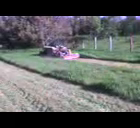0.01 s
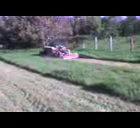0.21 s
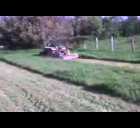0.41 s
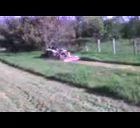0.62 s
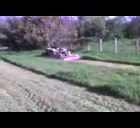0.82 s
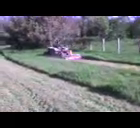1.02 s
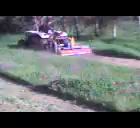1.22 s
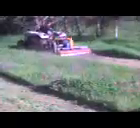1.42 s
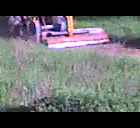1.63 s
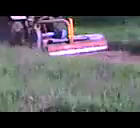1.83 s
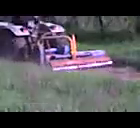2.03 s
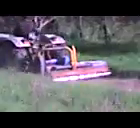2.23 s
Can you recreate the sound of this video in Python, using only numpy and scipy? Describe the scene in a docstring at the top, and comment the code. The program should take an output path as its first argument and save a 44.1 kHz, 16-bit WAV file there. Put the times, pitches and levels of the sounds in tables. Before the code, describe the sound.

A tractor-driven mower shreds tall grass over a steady diesel drone. Early on it hits something tough with a knock and a loud metallic rattle, then steady cutting returns. The open field sounds dull through a small microphone.

```python
"""Flail mower in tall grass

A diesel tractor drones through its exhaust pipe, a resonator driven by the firings, while the flails
shred stalks in a dense train of small impacts. Early on the rotor bites into something tough: a knock
and a loud rattling rasp excite the modes of the steel hood, then steady cutting is heard again.
Trees round the open field scatter a faint echo, and a small, dull microphone rounds the peaks."""
import sys
import numpy as np
from scipy import signal
from scipy.fft import rfft, irfft
from scipy.io import wavfile
from scipy.ndimage import uniform_filter1d

SR = 44100
rng = np.random.default_rng(int(sys.argv[2]) if len(sys.argv) > 2 else 0)


def inscribe(sig):
    """Save sig as 16-bit PCM at rate SR to the path in sys.argv[1].

    A 1-D sig is mono; a 2-D sig holds one channel per row.
    Samples are clipped to [-1, 1] before scaling.
    """
    pcm = np.round(np.clip(np.atleast_2d(sig).T, -1, 1) * 32767)
    wavfile.write(sys.argv[1], SR, pcm.astype(np.int16))


N = 101429

# Levels in the tables are relative; a spectrum gives level per unit bandwidth.
# Spectrum of stalks cut under the hood: f/Hz, level/dB
STALK_SPECTRUM = [(150, -32), (450, -10), (720, 1.5), (1050, 6), (1350, -2), (2050, 1.5), (2300, -3),
                  (2900, -6), (3200, -4.5), (3450, -16.5), (3900, -26.5), (4400, -50.5)]
# Envelope of the steady cutting: t/s, level/dB
CUTTING_ENVELOPE = [(0, -32), (.2, -34.5), (.6, -33), (.95, -35), (1.4, -33), (1.62, -35.5), (1.8, -34),
                    (2.14, -35), (2.3, -39.5)]
# Thick stems torn apart: t/s, level/dB, treble gain/dB
STEM_SNAPS = [(.594, -30.5, 1.5), (.675, -36.5, 7.5), (.858, -37.5, 12.5), (1.01, -35, 4.5),
              (1.218, -40, -5), (1.368, -31, 1.5), (1.752, -32.5, 5), (1.914, -40.5, 5.5),
              (2.034, -38.5, 9.5)]
# Whirr in the hood: multiple of the flail drive's rate, level/dB
WHIRR_ORDERS = [(17, -56.5), (20, -50.5), (21, -50.5), (22, -53)]
# Spectrum of hard debris striking the hood: f/Hz, level/dB
DEBRIS_SPECTRUM = [(25, -20), (60, -12), (160, -14), (280, -2), (480, -11), (750, -2.5), (1050, 0),
                   (1350, -2), (2000, -4), (2700, -4), (2900, -14.5), (3200, -7.5), (3500, -23),
                   (3900, -34.5), (4400, -51)]
# Envelope of debris churning under the hood: t/s, level/dB
CHURN_ENVELOPE = [(.204, -45), (.217, -22.5), (.255, -26.5), (.28, -24), (.31, -20), (.35, -14.5),
                  (.375, -17.5), (.41, -19), (.46, -18.5), (.515, -28), (.55, -35), (.62, -54)]
# Heavy blows of the flails: t/s, level/dB, treble gain/dB
FLAIL_BLOWS = [(.262, -25, -8.5), (.275, -16.5, -6.5), (0.321, -14.5, -7), (.335, -10, -5.5),
               (.346, -12.5, -1), (.363, -10.5, 6), (.373, -16, 7), (.388, -19.5, 3.5), (.403, -13.5, 4.5),
               (.413, -18, 4), (.43, -18.5, 1.5), (.462, -27, 5), (.508, -23, -0.5)]
# Dull knocks of clods on the hood: t/s, level/dB
CLOD_KNOCKS = [(.21, -15.5), (.343, -18), (.402, -25.5), (.446, -23.5)]
# Spectrum of a clod's knock: f/Hz, level/dB
CLOD_SPECTRUM = [(25, -11.5), (60, -0.5), (110, -2), (180, -2.5), (260, 16), (420, -7), (700, 10),
                 (1100, -2.5), (1700, -2), (2300, -18), (4000, -45)]
# Modes of the steel hood: f/Hz, T60/s, level/dB
HOOD_MODES = [(255.3, 0.16, -3.5), (736, 0.28, -12), (920, 0.23, -3.5), (1043.6, 0.24, -0.5),
              (1093, 0.07, -6), (1577, 0.15, -2), (2000, 0.12, -4), (2100, 0.14, -1.5), (2354, 0.14, -3.5),
              (2620, 0.072, -6), (2800, 0.043, -10.5), (2960, 0.088, -5.5)]
# Engine orders favoured by the exhaust pipe: multiple of the crank rate, level/dB
DRONE_ORDERS = [(10, -51), (11, -46.5), (12, -53), (13, -50.5), (14, -55.5)]
# Swelling of the drone: t/s, level/dB
DRONE_ENVELOPE = [(0, 4.5), (.6, 1.5), (1.02, -0.5), (1.14, 1.5), (1.44, -2.5), (1.54, 9), (1.66, -7),
                  (1.76, -5), (1.82, 6.5), (1.89, -5), (2.03, -0.5), (2.3, -1)]
# Spectrum of the ringing engine block: f/Hz, level/dB
BLOCK_SPECTRUM = [(300, -41.5), (600, -13), (800, -4.5), (1030, 2), (1180, -4), (1350, -13.5),
                  (2000, -10.5), (2500, -26.5), (4000, -50.5)]
# Spectrum of air and gas rumbling round the tractor: f/Hz, level/dB
RUMBLE_SPECTRUM = [(20, -40.5), (55, -9), (110, -3.5), (190, -1), (270, 6.5), (350, 2), (460, -5.5),
                   (900, -15), (3000, -39.5)]


def cutting(patchy_db=1.0):
    """Shot noise: countless stalk fractures merge into a hiss, uneven with the tufts; thick stems snap."""
    fractures = clicks(per_s=4500, spread_db=2) * undb(patchy_db * wander(60))
    stalks = envelope(CUTTING_ENVELOPE) * colour(fractures, STALK_SPECTRUM)
    return stalks + rasps(STEM_SNAPS, STALK_SPECTRUM, attack_s=.014, decay_s=.012)


def rotor(drive_hz=48.06, drift=.002, whine_hz=3053, whine_db=-51):
    """Rotation gives a whirr at harmonics of the drive rate; a narrow metal resonance adds a whine."""
    whine = resonant_band(rng.standard_normal(N), whine_hz, width_hz=33)
    turns = np.cumsum(drive_hz * (1 + drift * wander(8))) / SR
    return harmonics(turns, WHIRR_ORDERS, waver_db=4) + undb(whine_db) * whine


def bite(direct_db=-3, ring_db=-9.5, peak_s=.3642, peak_db=6.5):
    """Impact excitation: flail blows, chips and clods set the hood ringing; one sharp peak overloads with a
    faint click."""
    chips = colour(clicks(per_s=5300, spread_db=2.8), DEBRIS_SPECTRUM) * envelope(CHURN_ENVELOPE)
    blows = rasps(FLAIL_BLOWS, DEBRIS_SPECTRUM, attack_s=.003, decay_s=.0075)
    clods = colour(rng.standard_normal(N), CLOD_SPECTRUM)
    clods *= strikes(CLOD_KNOCKS, attack_s=.007, decay_s=.018)
    spike = colour(signal.unit_impulse(N, int(peak_s * SR)), DEBRIS_SPECTRUM)
    crack = undb(peak_db) * spike / spike.max()
    hits = chips + blows + clods
    return undb(direct_db) * hits + undb(ring_db) * hood(hits) + crack


def hood(hits):
    """Modal superposition: the steel rings as a sum of damped modes, scaled to the rms of the hits."""
    ring = sum(undb(db) * resonate(hits, hz, np.log(1000) / (np.pi * t60)) for hz, t60, db in HOOD_MODES)
    return unit(ring) * np.std(hits)


def engine(crank_hz=24.07, drift=.0015, weak_db=-5, scatter_db=5, clatter_db=-45, rumble_db=-43):
    """Pulse excitation: two firings a turn, one weaker, drive exhaust and block over a rumble of gas."""
    turns = np.cumsum(crank_hz * (1 + drift * wander(3.3))) / SR
    onsets = np.flatnonzero(np.diff(np.floor(2 * turns), prepend=-1))
    is_weak = np.arange(len(onsets)) % 2
    scatter = rng.standard_normal(200)[:len(onsets)]
    firings = np.zeros(N)
    firings[onsets] = undb(weak_db * is_weak + scatter_db * scatter)
    drone = exhaust(firings, turns)
    clatter = undb(clatter_db) * block(firings)
    rumble = undb(rumble_db) * colour(rng.standard_normal(N), RUMBLE_SPECTRUM)
    throb = unit(undb(2 * wander(55)))  # the low sound flickers by about 2 dB
    return (drone + rumble) * throb + clatter


def exhaust(firings, turns, pipe_hz=276.8, puff_s=.0099, puff_db=-48):
    """Pipe resonance: the exhaust favours the engine orders and the puff noise near its own frequency."""
    puffs = signal.fftconvolve(firings, decay(puff_s))[:N] * rng.standard_normal(N)
    pipe = undb(puff_db) * resonant_band(puffs, pipe_hz, width_hz=92)
    return envelope(DRONE_ENVELOPE) * (harmonics(turns, DRONE_ORDERS, waver_db=3) + pipe)


def block(firings, decay_s=.011, repeat_share=.48):
    """Structure-borne sound: each firing rings the block, partly alike every time, partly at random."""
    fade = decay(decay_s)
    alike = signal.fftconvolve(firings, fade * rng.standard_normal(len(fade)))[:N]
    loose = signal.fftconvolve(firings, fade)[:N] * rng.standard_normal(N)
    return colour(repeat_share * unit(alike) + (1 - repeat_share) * unit(loose), BLOCK_SPECTRUM)


def tree_echo(sound, t60_s=.38):
    """Diffuse scattering: the trees return the sound as an exponentially decaying tail."""
    age = np.arange(SR // 2) / SR
    response = rng.standard_normal(len(age)) * undb(-60 * age / t60_s)
    return signal.fftconvolve(sound, response / np.linalg.norm(response))[:N]


def clicks(per_s, spread_db):
    """Poisson process: independent tiny impacts of uneven size and either sign."""
    size = undb(spread_db * np.minimum(rng.exponential(size=N), np.pi + 1))
    return (rng.random(N) < per_s / SR) * size * np.sign(rng.standard_normal(N))


def rasps(rows, spectrum, attack_s, decay_s, split_hz=1100):
    """Amplitude modulation: bursts of noise, each with its own treble gain above split_hz."""
    noise = colour(rng.standard_normal(N), spectrum)
    body = signal.sosfiltfilt(signal.butter(2, split_hz, fs=SR, output="sos"), noise)
    body_gain = strikes([(s, db) for s, db, _ in rows], attack_s, decay_s)
    treble_gain = strikes([(s, db + treble) for s, db, treble in rows], attack_s, decay_s)
    return body * body_gain + (noise - body) * treble_gain


def strikes(rows, attack_s, decay_s):
    """Damped transients: a linear rise and an exponential fall for each row of t/s, level/dB."""
    gain = np.zeros(N)
    for start, db in rows:
        age = np.maximum(np.arange(N) / SR - start, 0)
        rise = np.minimum(age / attack_s, 1)
        gain += undb(db) * rise * np.exp(-np.maximum(age - attack_s, 0) / decay_s)
    return gain


def harmonics(turns, rows, waver_db):
    """Harmonic series: wavering tones at whole multiples of a shaft's rate."""
    tones = np.zeros(N)
    for order, db in rows:
        waver = undb(waver_db * wander(13))
        tones += undb(db) * unit(waver * np.sin(2 * np.pi * (order * turns + rng.random())))
    return tones


def colour(x, spectrum, size=8192):
    """Minimum-phase filtering through points of f/Hz, level/dB; the result has unit rms."""
    hz, db = np.array(spectrum).T
    bin_hz = np.arange(size // 2 + 1) * SR / size
    log_gain = np.log(undb(np.interp(np.log(bin_hz + 1), np.log(hz), db)))
    cepstrum = irfft(log_gain)[:size // 2]
    cepstrum[1:] *= 2  # folding the cepstrum makes the filter causal
    response = irfft(np.exp(rfft(cepstrum, size)))[:size // 2]
    return unit(signal.fftconvolve(x, response)[:N])


def resonate(x, hz, width_hz):
    """Second-order resonance with unit gain at its centre."""
    return signal.lfilter(*signal.iirpeak(hz, hz / width_hz, fs=SR), x)


def resonant_band(x, hz, width_hz):
    """Two resonances in cascade steepen the skirts of a band; the result has unit rms."""
    return unit(resonate(resonate(x, hz, width_hz), hz, 2 * width_hz))


def low_pass(x, hz):
    """Elliptic filtering: a steep cut above hz."""
    return signal.sosfilt(signal.ellip(8, .2, 80, hz, fs=SR, output="sos"), x)


def wander(per_s):
    """Random fluctuation: per_s values a second, smoothed and scaled to unit rms."""
    hold = int(SR / per_s)
    steps = np.repeat(rng.standard_normal(N // hold + 2), hold)
    return unit(uniform_filter1d(uniform_filter1d(steps, hold), hold)[:N])


def decay(decay_s):
    """Exponential decay over 0.1 s."""
    age = np.arange(SR // 10) / SR
    return np.exp(-age / decay_s)


def envelope(rows):
    """Gain interpolated through points of t/s, level/dB."""
    return undb(np.interp(np.arange(N) / SR, *np.array(rows).T))


def undb(db):
    """Level to amplitude ratio."""
    return 10 ** (np.asarray(db) / 20)


def unit(x):
    """Normalisation to unit rms."""
    return x / np.sqrt(np.mean(x ** 2))


def scene(echo_db=-14):
    """Superposition: tractor and mower add to their faint echo in one channel."""
    machine = engine() + cutting() + rotor() + bite()
    return (machine + undb(echo_db) * tree_echo(machine))[None]


def record(dry, saturation=.75, mic_top_hz=4250, full_scale=.7):
    """Saturation and band limiting: the microphone rounds peaks and cuts treble; the top peak clips."""
    dull = low_pass(saturation * np.tanh(dry / saturation), mic_top_hz)
    return low_pass(np.clip(dull, -full_scale, full_scale), hz=15500)


dry = scene()
out = record(dry)
inscribe(out)
```